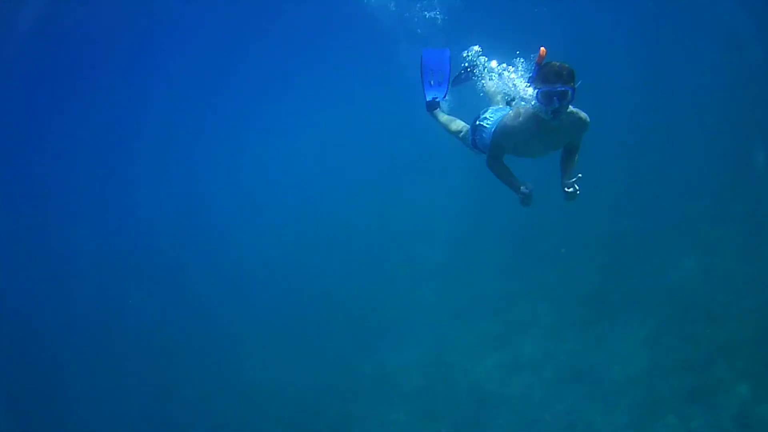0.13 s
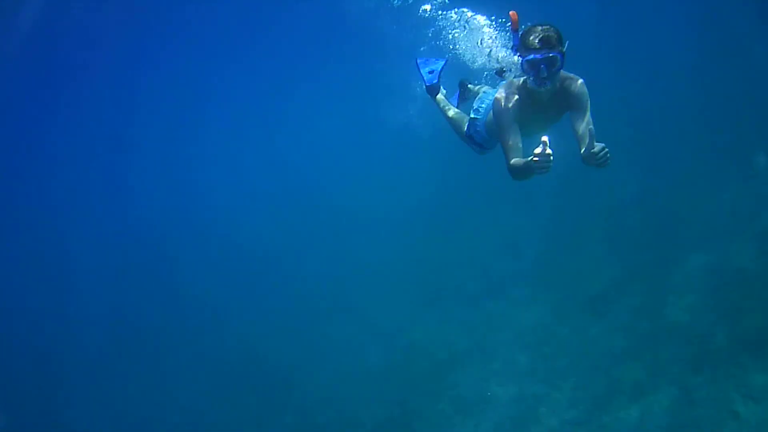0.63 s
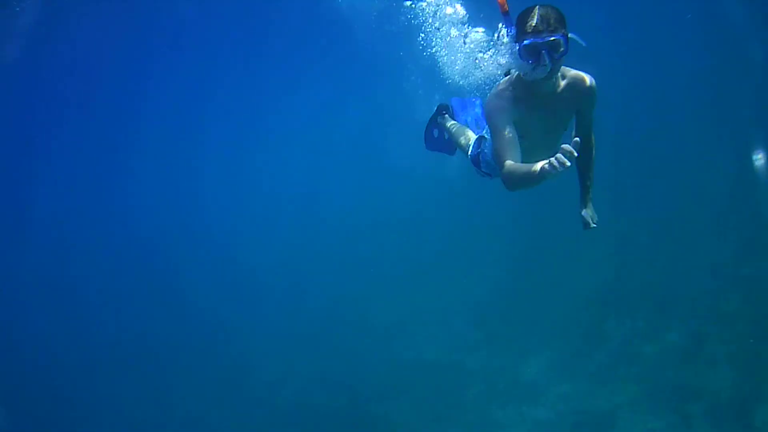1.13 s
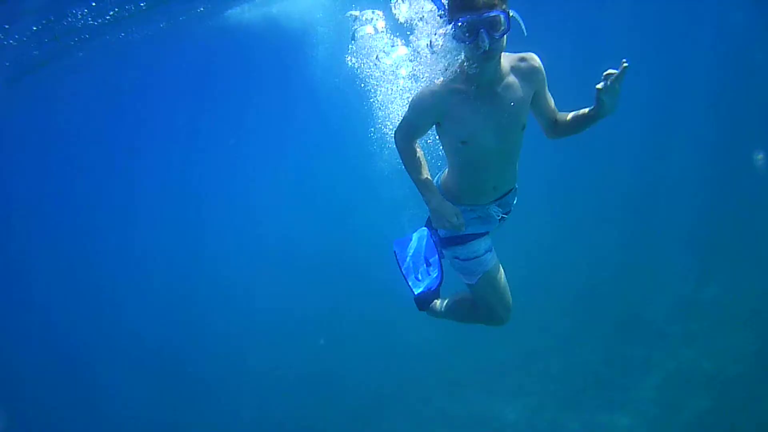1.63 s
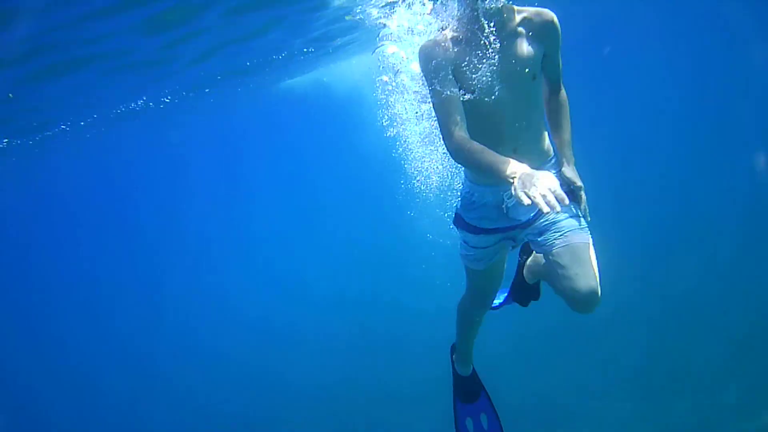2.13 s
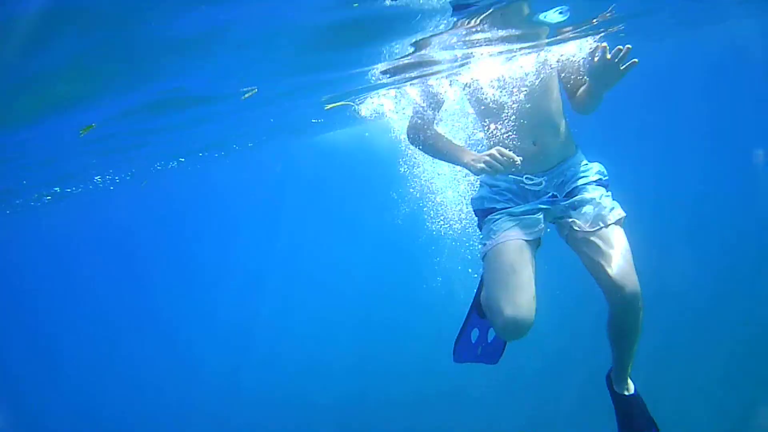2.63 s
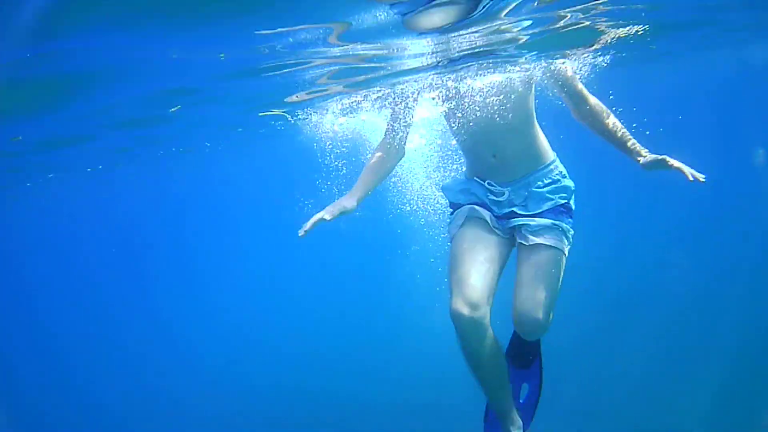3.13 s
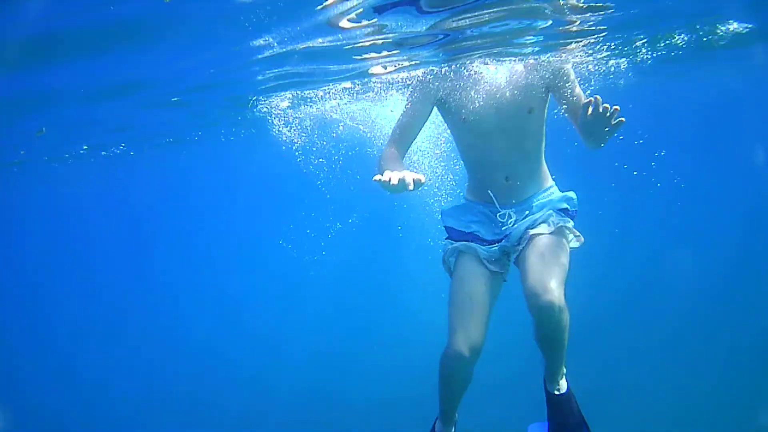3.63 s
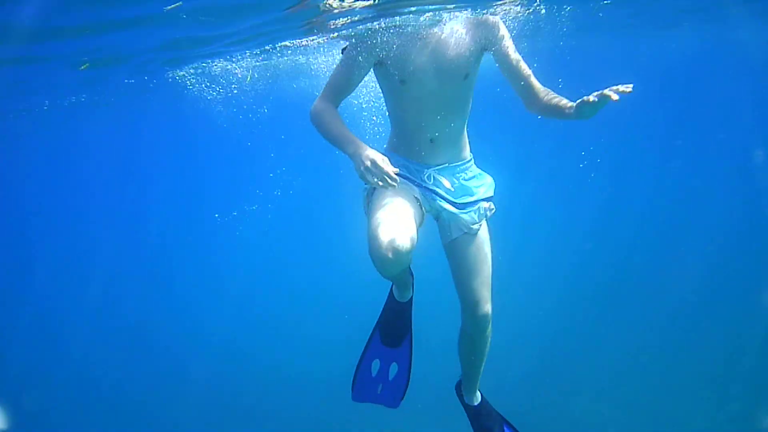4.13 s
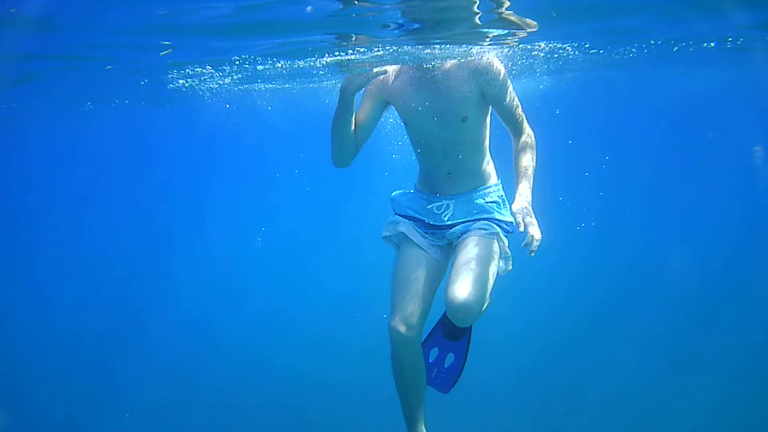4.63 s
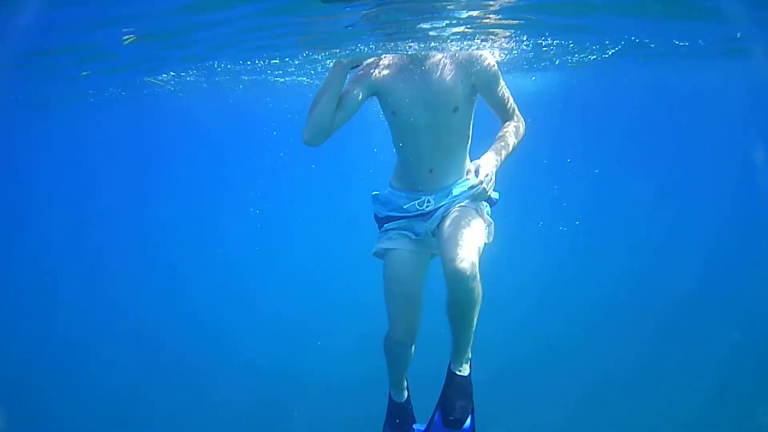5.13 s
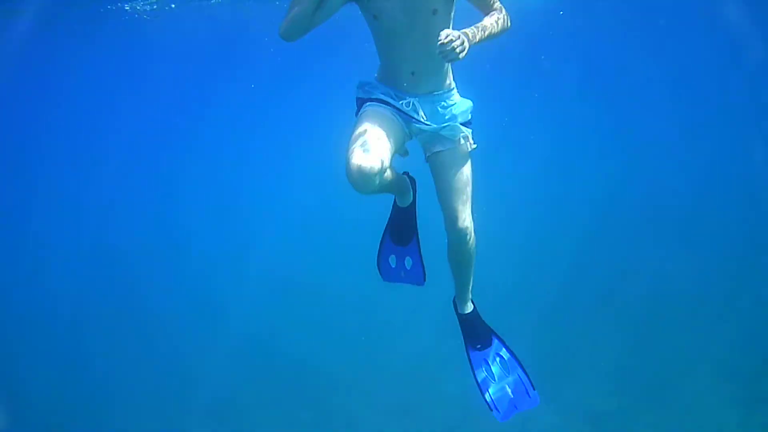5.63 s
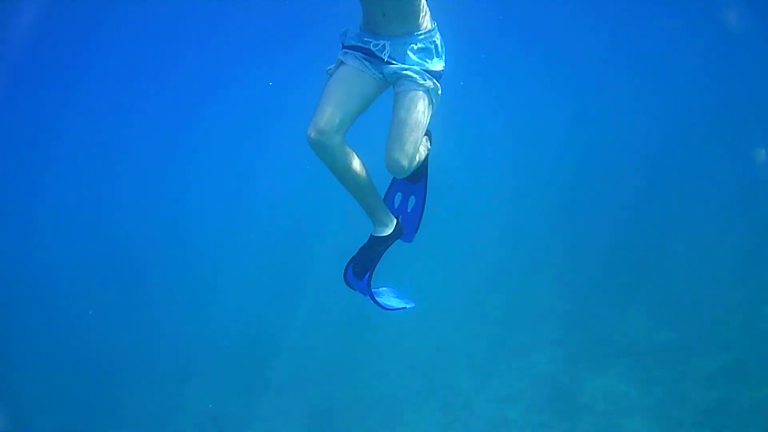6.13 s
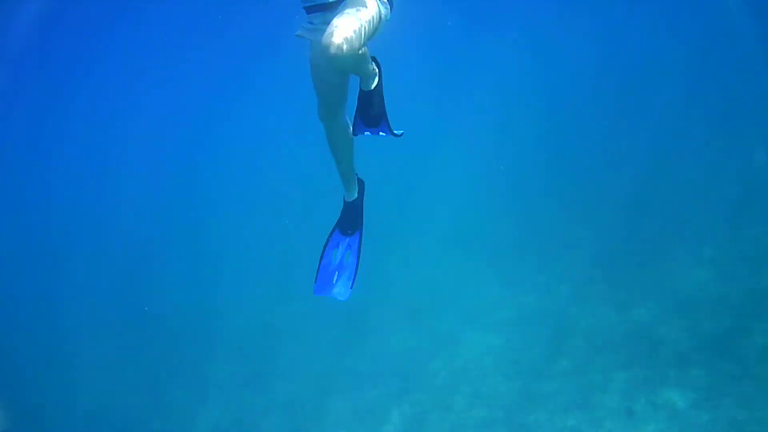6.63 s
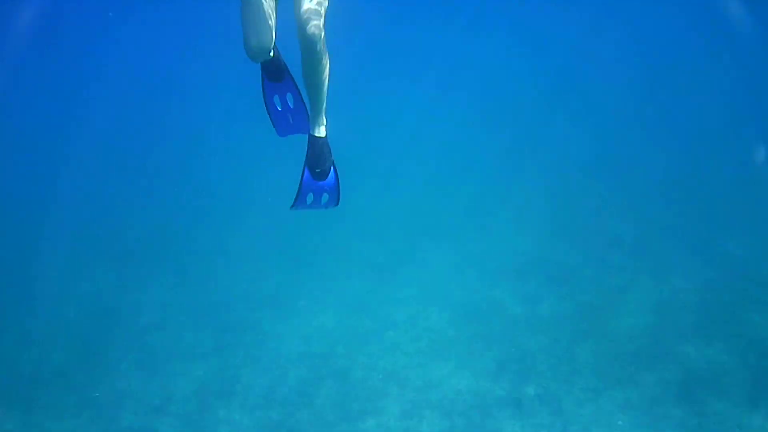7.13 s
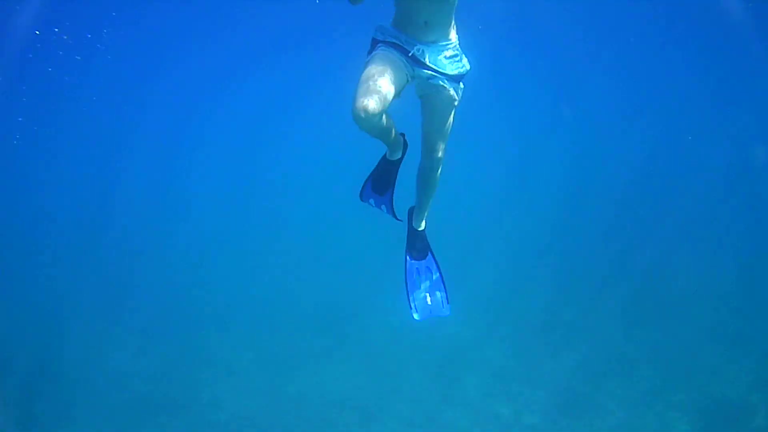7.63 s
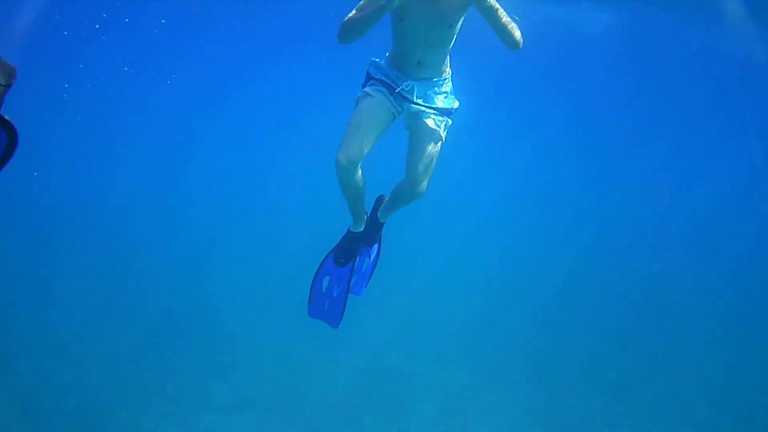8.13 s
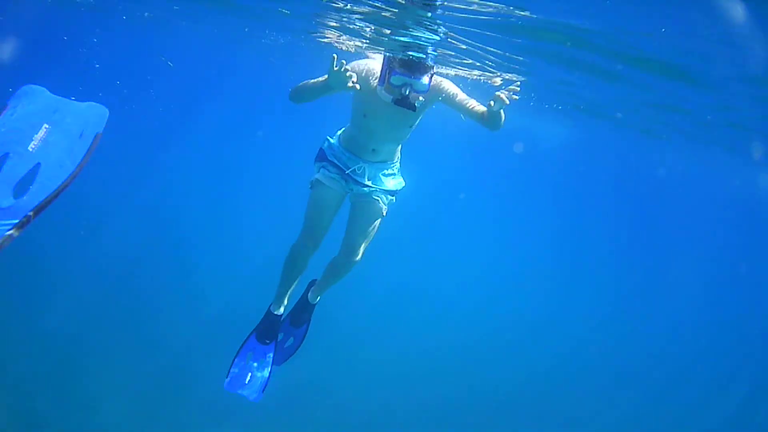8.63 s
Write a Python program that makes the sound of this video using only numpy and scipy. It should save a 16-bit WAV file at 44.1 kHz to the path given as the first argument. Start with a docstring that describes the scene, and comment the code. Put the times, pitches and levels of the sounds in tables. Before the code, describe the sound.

A muffled mono underwater sound, heard through a sealed camera case in the sea. From 0 to about 1.8 seconds a snorkeler's bubbles gurgle densely, hollow and ringing in the middle range with fine fizz above and distinct bloops, one strong near 1.2. The cloud thins by 2.5, leaving quiet water and stray pops, a firm one at 3.0. Around 4.6 to 5.2 a softer burble returns, then fades. A sharp bubble plop lands at 6.4, and a tight cluster chatters from 7.05 to 7.3. Very low surges swell and sink throughout, heaviest from 8.0 to 8.5, before a short gurgle rises at the very end. Small dry ticks crackle irregularly, more often after 7. Constant underneath are a buzz stuttering about 23 times a second, a thin very high whine with rapid faint clicking, and steady hiss.

```python
"""Slow surges of the sea press on a sealed camera housing: low noise that swells and sinks.
A swimmer's bubbles, alone and in swarms, are damped sines that gurgle and ping through its resonances.
Small ticks crackle, each a noise crack with a short blip. The camera's own electronics leak in:
a square-wave buzz in bursts, a display scan whistle with a click at each field, and steady hiss."""
import sys
import numpy as np
from scipy import signal
from scipy.fft import rfft, irfft, next_fast_len
from scipy.io import wavfile
from scipy.ndimage import uniform_filter1d, map_coordinates

SR = 44100
rng = np.random.default_rng(int(sys.argv[2]) if len(sys.argv) > 2 else 0)


def file_out(sig):
    """Save sig as 16-bit WAV at sys.argv[1]."""
    # one column per channel
    cols = np.atleast_2d(sig).T
    # limit, then scale
    lim = np.clip(cols, -1, 1)
    pcm = np.round(lim * 32767).astype(np.int16)
    wavfile.write(sys.argv[1], SR, pcm)


def invert_db(level):
    """Linear amplitude ratio for a level in decibels (20 dB per decade), elementwise."""
    return 10 ** (np.asarray(level, dtype=float) / 20)


N = 386757
T = np.arange(N) / SR  # time of each sample, in seconds


def unit(x):
    """Scales a sound to rms 1."""
    return x / np.sqrt(np.mean(x ** 2) + 1e-20)


def curves(rows):
    """Draws straight lines between table rows: one value per sample for each column after the time."""
    times, *columns = np.transpose(rows)
    return [np.interp(T, times, column) for column in columns]


def filtered(x, response):
    """Multiplies the spectrum of x by a response, given as a function of frequency in Hz."""
    size = next_fast_len(N + SR // 2)  # spare room lets the filter ring out
    hz = np.fft.rfftfreq(size, 1 / SR)
    return irfft(rfft(x, size) * response(hz), size)[:N]


def noise(points):
    """Noise of rms 1, coloured by (Hz, dB) points joined on a log frequency axis."""
    point_hz, point_db = np.transpose(points)

    def colour(hz):
        return invert_db(np.interp(np.log(hz + 1), np.log(point_hz + 1), point_db, right=-120))

    return unit(filtered(rng.standard_normal(N), colour))


def grains(start, db, hz, t60, rise, attack, size):
    """Damped sines that lose 60 dB in t60 seconds, with a pitch that rises as they die."""
    t = np.arange(size) / SR
    start, db, hz, t60 = (np.asarray(v, float)[:, None] for v in (start, db, hz, t60))
    envelope = invert_db(db - 60 * t / t60) * (1 - np.exp(-t / attack))
    wave = envelope * np.sin(2 * np.pi * hz * t * (1 + rise * t / t60))
    at = (start * SR).astype(int) + np.arange(size)
    return np.bincount(at.ravel(), wave.ravel(), N + size + SR)[:N]  # adds up overlapping grains


def puffs(start, db, t60, attack, size):
    """Noise bursts that die away: damped sines multiplied by noise."""
    carrier = grains(start, db, 0 * start + SR / 4, t60, rise=0, attack=attack, size=size)
    return carrier * rng.standard_normal(N)


# Resonances of the housing: (centre [Hz], width [Hz], level [dB])
HOUSING_MODES = [(628, 176, -4), (847, 132, -2), (1410, 44, -3), (1750, 73, -7), (2500, 130, -55),
                 (3400, 380, -67)]


def case(hz):
    """Response of the housing: resonances added up with alternating sign."""
    total = 0
    for k, (centre, width, db) in enumerate(HOUSING_MODES):
        damping = 1j * hz * width
        total = total + (-1) ** k * invert_db(db) * damping / (centre * centre - hz * hz + damping)
    return total


# Strength of the water pressing on the case: (time [s], level [dB])
SURGE_LEVEL = [(0, -38.5), (.41, -28), (.95, -32), (1.15, -25), (1.5, -32), (1.7, -33), (2.1, -28.5),
               (2.8, -31), (3.66, -25), (4.5, -28.5), (4.9, -35.5), (5.6, -31.5), (6.6, -27.5), (7.2, -29),
               (7.7, -34), (8, -23.5), (8.4, -20.5), (8.77, -26)]
# Colour of the surge: (frequency [Hz], relative level per Hz [dB])
SURGE_COLOUR = [(1, -1), (5, 4.5), (12, 3), (18, -7), (25, -21.5), (35, -25), (60, -120)]
# Colour of the rumble: (frequency [Hz], relative level per Hz [dB])
RUMBLE_COLOUR = [(14, -120), (20, 16.5), (30, 14), (42, 12), (60, -0.5), (85, -4), (130, -4.5),
                 (200, -17.5), (300, -120)]


def surge():
    """Water presses on the case as very low noise; a rumble above it follows the surge weakly."""
    surge_db, = curves(SURGE_LEVEL)
    rumble_db = -44.5 + 0.23 * (surge_db - surge_db.mean())  # 0.23 dB per dB of surge
    return invert_db(surge_db) * noise(SURGE_COLOUR) + invert_db(rumble_db) * noise(RUMBLE_COLOUR)


def swarm(count, hz, spread, cycles, scatter_db, clump_db, size):
    """Random bubbles of rms 1 together: log-normal pitch, each dying over so many cycles of it."""
    place, z = rng.random(count), rng.standard_normal((count, 2))
    clumps = map_coordinates(rng.standard_normal(70), [place * 65])  # smooth loud and soft stretches
    pitch = hz * np.exp(spread * z[:, 0])
    db = scatter_db * np.clip(z[:, 1], -2, 2) + clump_db * clumps
    # the onset time is two cycles of the middle pitch
    return unit(grains(place * N / SR, db, pitch, cycles / pitch, rise=0.047, attack=2 / hz, size=size))


# Air shed by the swimmer: (time [s], bubble cloud level [dB], fine spray level [dB], thin ring level [dB])
CHURN_LEVELS = [(0, -44.5, -58, -57), (.8, -45, -57, -61), (1.22, -48, -59, -64), (1.63, -46, -61.5, -73),
                (1.85, -52, -54, -60), (2.12, -56, -58, -65), (2.5, -62, -64.5, -68),
                (3.15, -58.5, -62.5, -70), (3.5, -64, -65.5, -73), (4.44, -68, -72, -77),
                (4.64, -57.5, -68, -60.5), (5.08, -51, -61.5, -63.5), (5.35, -59.5, -64, -70),
                (6.1, -55.5, -66, -71), (6.55, -57.5, -62, -67), (6.8, -60, -58.5, -65),
                (7.5, -62, -66.5, -62), (8.35, -67.5, -68, -63.5), (8.6, -62, -75, -71),
                (8.77, -50, -57.5, -72)]
# Colour of the water stirred by the rising air: (frequency [Hz], relative level per Hz [dB])
STIRRED_COLOUR = [(40, -120), (60, -3), (85, 0.5), (120, -5.5), (210, -6.5), (300, -120)]


def churn():
    """Swarms of bubbles ring the case; one cloud drives the ring, the big bubbles and the stirring."""
    cloud_db, spray_db, thin_db = curves(CHURN_LEVELS)
    from_full_db = cloud_db + 45  # a full cloud is at -45 dB
    stirred = invert_db(-49.5 + 0.77 * from_full_db) * noise(STIRRED_COLOUR)

    big = swarm(count=1650, hz=391.5, spread=0.3273, cycles=38.0, scatter_db=3, clump_db=2.5, size=3000)
    big = invert_db(-51.5 + 0.82 * from_full_db) * big

    gurgle = swarm(count=3600, hz=752.0, spread=0.403, cycles=25.5, scatter_db=2.5, clump_db=2.9, size=1100)
    ring = invert_db(cloud_db) * unit(filtered(gurgle, case))

    thin = swarm(count=1200, hz=1410, spread=0.027, cycles=100, scatter_db=1.0, clump_db=3.0, size=2200)
    thin = invert_db(thin_db) * thin

    small = swarm(count=5000, hz=2917, spread=0.357, cycles=61, scatter_db=4.0, clump_db=1.5, size=500)
    # part of the fizz bypasses the resonances; only what lies above 1600 Hz is kept
    fizz = unit(filtered(small, lambda f: (case(f) + 0.14) * (f > 1600)))
    return stirred + big + ring + thin + invert_db(spray_db) * fizz


# Single bubbles: (time [s], level before the soft onset [dB], starting pitch [Hz], 60 dB decay time [s])
SINGLE_BUBBLES = [(.071, -22.5, 614, .06), (.099, -27, 626, 0.072), (.203, -28, 587, 0.054),
                  (.279, -24.5, 670, 0.026), (.377, -32.5, 1690, 0.024), (.5012, -32.5, 1750, 0.03),
                  (.546, -29, 410, 0.037), (.6045, -38, 1680, .044), (.655, -33, 350, 0.06),
                  (.72, -28, 806, 0.037), (.784, -29, 622, .07), (.824, -29, 690, 0.051),
                  (1.0045, -34.5, 1437, 0.069), (1.015, -35, 1720, .04), (1.0216, -35, 1410, 0.084),
                  (1.205, -20.5, 390, .032), (1.205, -26, 785, .036), (1.206, -29, 654, 0.05),
                  (1.477, -28, 239, 0.08), (1.549, -36, 217, .08), (1.593, -24.5, 688, 0.046),
                  (1.594, -33, 328, 0.057), (1.661, -31, 844, .054), (1.754, -32, 804, 0.043),
                  (1.9559, -31.5, 1410, 0.031), (2.019, -29.5, 682, 0.05), (2.19, -36, 950, 0.032),
                  (2.622, -33.5, 806, 0.055), (2.765, -35, 1440, 0.032), (2.9705, -33.5, 1410, 0.071),
                  (3.035, -19, 633, 0.029), (3.2345, -37, 1610, 0.033), (4.5155, -33.5, 1400, 0.055),
                  (4.619, -34.5, 803, 0.084), (4.7151, -33, 1820, 0.021), (4.872, -33.5, 231, 0.055),
                  (4.9181, -41, 1420, .04), (4.987, -32, 607, 0.027), (5.139, -35, 533, .042),
                  (5.266, -31, 760, 0.025), (5.802, -39, 350, .06), (5.849, -40, 1790, .04),
                  (5.909, -36, 172, 0.045), (6.0, -34, 616, .037), (6.038, -27, 648, 0.028),
                  (6.255, -34, 714, 0.02), (6.32, -35, 573, 0.041), (6.439, -18, 636, 0.03),
                  (6.439, -32, 405, 0.058), (6.4397, -40, 1370, 0.064), (6.447, -25, 810, 0.049),
                  (6.46, -25, 647, 0.034), (6.586, -33, 662, .05), (6.6854, -39.5, 1374, .055),
                  (7.051, -27, 834, 0.036), (7.062, -27, 836, 0.068), (7.073, -38, 1410, 0.051),
                  (7.077, -27, 776, 0.048), (7.094, -37, 849, 0.11), (7.177, -29, 827, 0.026),
                  (7.189, -34, 815, 0.047), (7.222, -31, 840, 0.045), (7.285, -31, 796, 0.025),
                  (7.625, -45, 1700, .046), (7.7593, -43, 1760, .04), (8.457, -28, 650, 0.04),
                  (8.69, -35.5, 504, .085), (8.6915, -34, 1480, 0.021), (8.719, -31, 837, 0.046),
                  (8.7256, -41, 2010, 0.029), (8.744, -24.5, 1820, 0.015)]


def bubbles():
    """Single bubbles ring at their own pitch; the water they displace sloshes against the case."""
    start, db, hz, t60 = np.transpose(SINGLE_BUBBLES)
    tone = grains(start, db, hz, t60, rise=0.022, attack=0.0031, size=6000)
    slosh = puffs(start, db + 8.5, t60, attack=0.00061, size=6000)
    return tone + filtered(slosh, lambda f: (case(f) + 0.41) / (1 + 1j * f / 700) ** 2)


# The clear ticks: (time [s], blip level before onset [dB], blip pitch [Hz], crack level before filter [dB])
CLEAR_TICKS = [(.1217, -41, 3600, -30.5), (.2471, -36.5, 4670, -32), (.3142, -31.5, 2300, -42),
               (.4903, -32, 2460, -34), (.6335, -38, 2750, -30), (.7424, -41, 2500, -29),
               (.85, -36.5, 3310, -34), (.9492, -49, 2820, -29), (1.6056, -36, 2520, -29),
               (1.7559, -38, 3300, -34.5), (1.8243, -36, 4040, -36), (1.879, -41, 2540, -36),
               (1.9756, -38, 2410, -36), (2.6612, -38, 2730, -37), (2.8591, -37, 3500, -27.5),
               (3.699, -34, 2610, -31), (4.0783, -38, 3300, -34), (5.2825, -40, 3500, -36),
               (5.456, -37, 3660, -38), (5.5164, -38, 3980, -34), (5.8605, -42, 3610, -34),
               (6.113, -39, 2750, -40), (6.4386, -28.5, 3660, -37), (6.931, -52, 2840, -30),
               (7.2552, -41, 2890, -29), (7.3337, -39, 3440, -38), (7.459, -40, 3250, -34),
               (7.5737, -37, 3700, -33), (7.6655, -29, 3950, -45), (7.7149, -41, 3340, -38),
               (7.746, -33, 4100, -38), (8.0753, -37.5, 3720, -40), (8.148, -44, 3750, -44),
               (8.2114, -35.5, 3400, -31), (8.349, -40, 3720, -35), (8.5634, -38, 3280, -38),
               (8.6915, -44, 2300, -39), (8.7425, -41, 3040, -40)]


def ticks():
    """Small snaps, clear and faint: a short noise crack and a blip of a few cycles."""
    count = 30  # faint ticks, at random moments
    place, z = rng.random(count), rng.standard_normal((count, 3))
    faint_blip_db = -43.5 + 2.5 * z[:, 0]
    faint_hz = 3300 * np.exp(.15 * z[:, 1])
    faint_crack_db = -36 + 2.5 * z[:, 2]
    faint = np.c_[place * N / SR, faint_blip_db, faint_hz, faint_crack_db]
    start, db, hz, crack_db = np.vstack([CLEAR_TICKS, faint]).T
    blip = grains(start, db, hz, 24 / hz, rise=0.013, attack=0.00021, size=700)
    crack = puffs(start, crack_db, 0 * start + 0.0099, attack=0.00082, size=500)
    return blip + filtered(crack, lambda f: (f > 1500) / (1 + (f / 12000) ** 2))


def buzz():
    """A load switches on in bursts and draws a square wave; the supply sags behind it."""
    burst_hz, square_hz = 22.75878, 722.1
    since = (T * burst_hz - .274) % 1 / burst_hz  # seconds since the load came on
    turn = 2 * np.pi * square_hz * (since - .00157)  # phase of the square wave
    duty = 0.5275  # share of each cycle spent high
    k = np.arange(1, 19)[:, None]  # harmonic numbers
    height = 2 / (np.pi * k) * np.sin(np.pi * k * duty)
    square = duty + np.sum(height * np.cos(k * (turn - np.pi * duty)), 0)
    square = np.where(turn > 0, square, 0)  # the square starts a moment after the load
    ripple = 0.098 * np.sin(8 * turn)  # the switching clock, eight times faster
    on = uniform_filter1d(1. * (since < .0317), size=9)  # burst of 31.7 ms with softened edges

    def sag(f):
        """High-pass at 38 Hz and a gentle low-pass at 7 kHz."""
        return (1j * f) ** 2 / (38 ** 2 - f * f + 1j * f * 32) / (1 + 1j * f / 7000)

    return invert_db(-46.0) * filtered(on * (0.7 + square + ripple), sag)


def display():
    """The line whistle drops out at each field's blanking, which clicks; its half tone alternates by field."""
    field_hz, lines_per_field = 58.200417, 264
    field = T * field_hz  # fields scanned so far
    blank = ((field - .155) % 1) / field_hz  # seconds since blanking began
    dropout = np.clip(np.minimum(blank / 0.00055, (.003 - blank) / 0.0013), 0, 1)
    whistle = invert_db(-50.5) * (1 - 1.1 * dropout) * np.sin(2 * np.pi * lines_per_field * field)

    odd = uniform_filter1d(1. * ((field / 2 - .63) % 1 < .5), size=40)  # 1 in every other field
    # strong in odd fields, weak and upside down in the others
    half = invert_db(-59.5) * (1.315 * odd - .3) * np.sin(np.pi * lines_per_field * field)

    # a sharp pulse, then a softer dip the other way
    click = np.exp(-blank / 0.00035) - 0.4 * np.exp(-((blank - .0011) / 0.00087) ** 2)
    return whistle + half + filtered(invert_db(-45.0) * click, lambda f: 1 / (1 + 1j * f / 3500))


# Colour of the hiss: (frequency [Hz], relative level per Hz [dB])
HISS_COLOUR = [(90, -16), (130, -9), (560, -12.5), (720, -11.5), (900, -10), (1200, -16.5), (2200, -18.5),
               (6900, -25), (11000, -26), (14000, -25.5), (15700, -37)]


def hiss():
    """Steady noise of the electronics."""
    return invert_db(-56.5) * noise(HISS_COLOUR)


def scene():
    """Water, bubbles and ticks over the camera's own noises, as one channel."""
    water = surge() + churn() + bubbles() + ticks()
    return (water + buzz() + display() + hiss())[None]


def top_cut(x):
    """Nothing passes above the cut-off."""
    return signal.sosfilt(signal.butter(12, 16850, fs=SR, output="sos"), x)


def record(dry):
    """The converter sits slightly off centre and rolls off into its band limit."""
    top_hz = 15730
    limited = filtered(dry[0], lambda f: (f < top_hz) / (1 + (f / 15800) ** 40))
    mix = limited[None] - .0097  # constant offset
    return top_cut(mix)


dry = scene()
out = record(dry)
file_out(out)
```